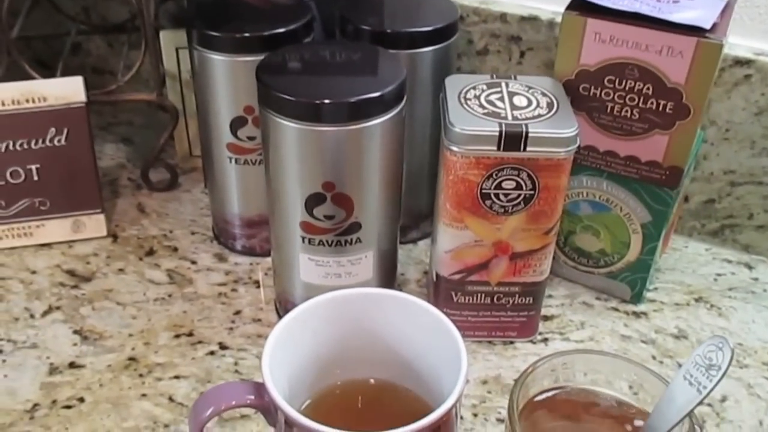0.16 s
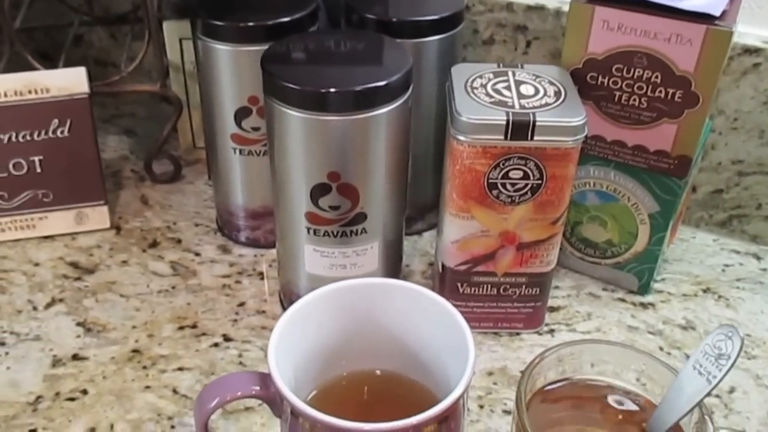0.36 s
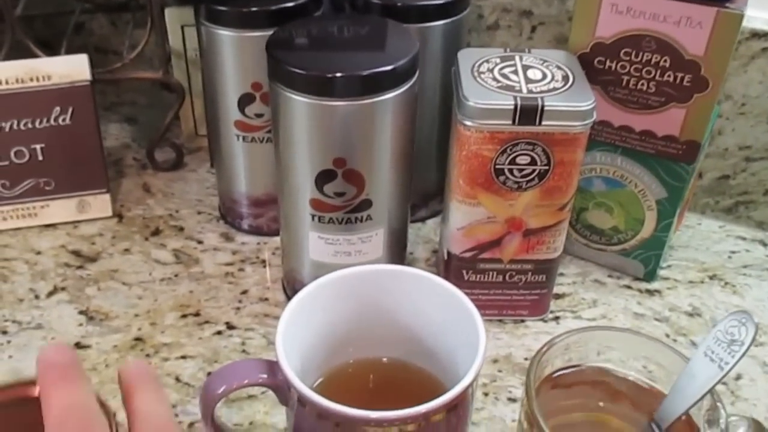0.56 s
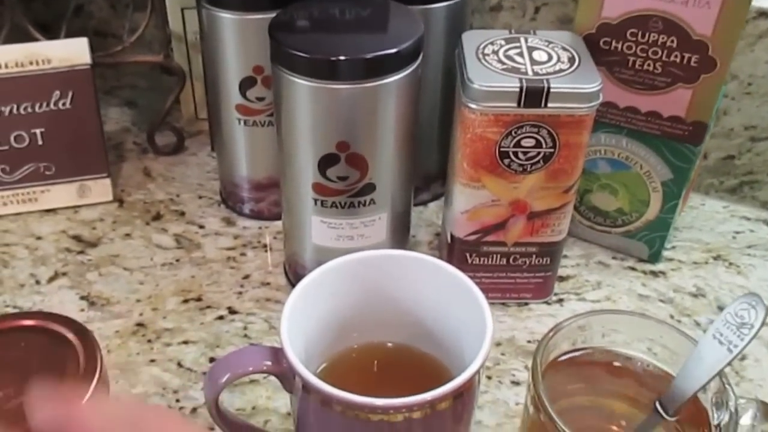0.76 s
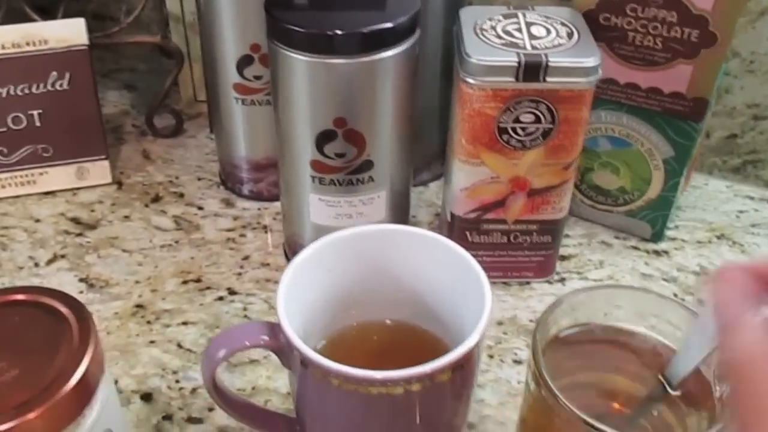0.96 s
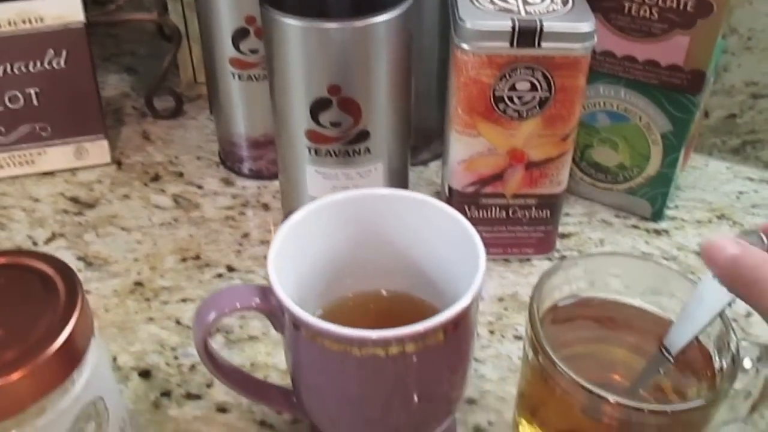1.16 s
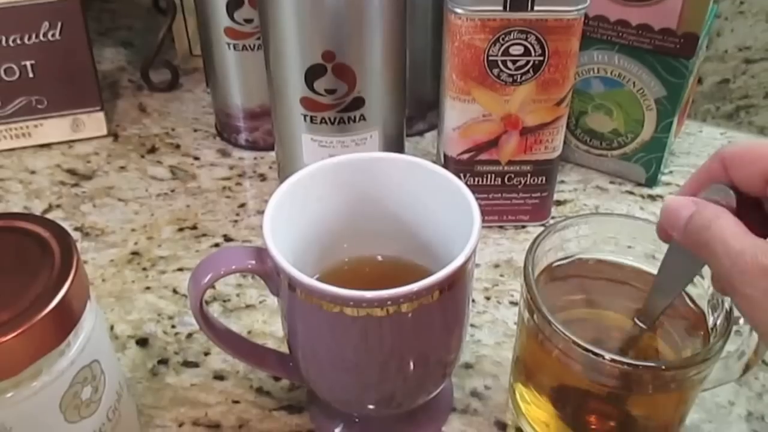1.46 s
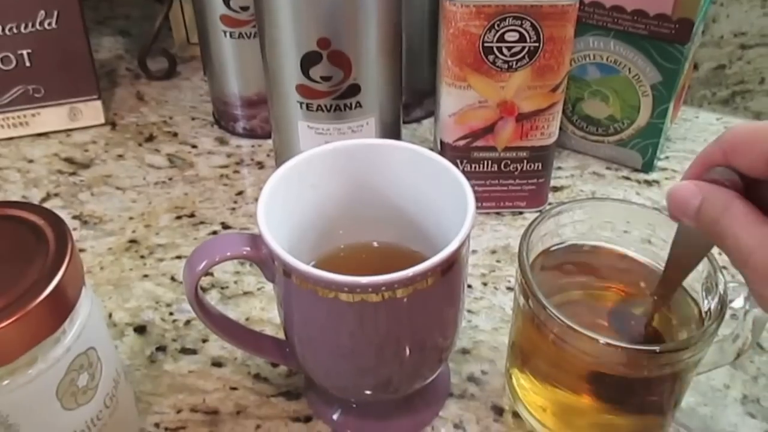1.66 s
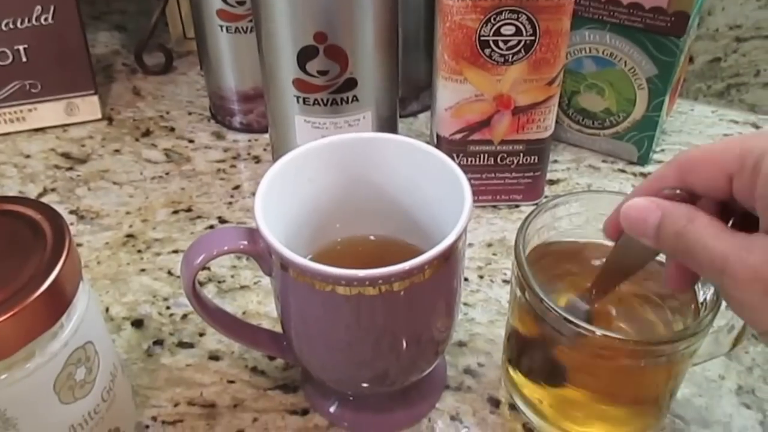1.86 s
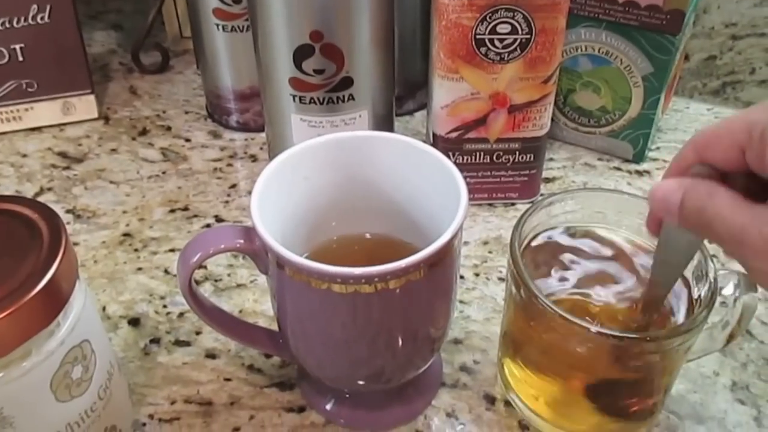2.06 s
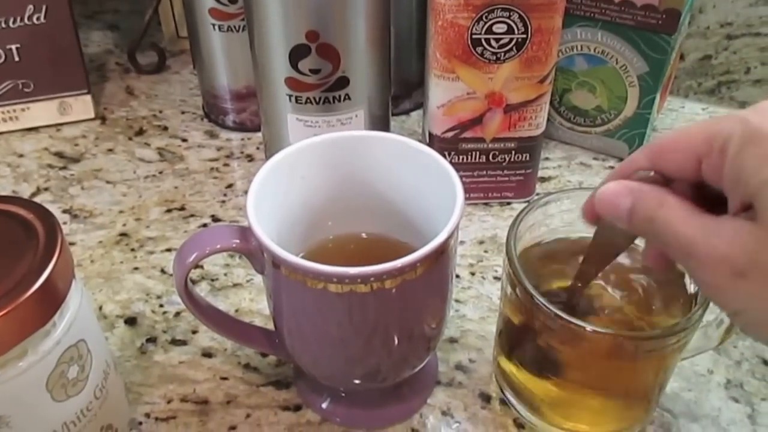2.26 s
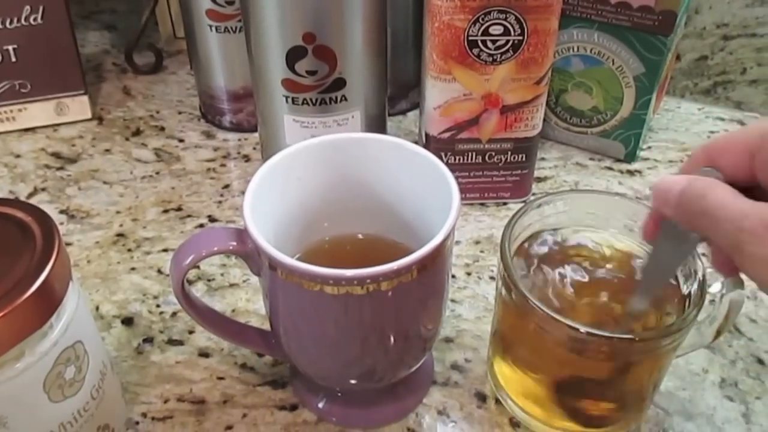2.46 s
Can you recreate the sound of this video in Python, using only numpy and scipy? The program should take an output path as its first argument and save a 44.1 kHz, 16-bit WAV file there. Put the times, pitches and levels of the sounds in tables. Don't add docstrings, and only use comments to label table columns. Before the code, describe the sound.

A teaspoon clinks against a glass mug from about 1.65 s to the end, bright and uneven, strongest near 1.65 and 2.19 s, with soft tea slosh and bubbles from 1.9 s. Earlier, a jar thuds hard on a stone counter at 0.23 s, overloading the close microphone, then slides grittily until 0.85 s. Faint finger ticks near 1.4 s. Low room hum and handling rumble dip after the thud, then rise.

```python
import sys
import numpy as np
from scipy import signal
from scipy.fft import rfft, irfft, next_fast_len
from scipy.io import wavfile
from scipy.ndimage import map_coordinates

SR = 44100
rng = np.random.default_rng(int(sys.argv[2]) if len(sys.argv) > 2 else 0)


def wav_record(signal):
    frames = np.transpose(np.atleast_2d(signal))
    bounded = np.clip(frames, -1, 1)
    quanta = np.round(bounded * 32767).astype(np.int16)
    wavfile.write(sys.argv[1], SR, quanta)


def decibels_to_gain(level_db):
    exponent = np.asarray(level_db, float) / 20
    return 10 ** exponent


N = 114660
TIME = np.arange(N) / SR


def unit(x):
    return x / np.sqrt(np.mean(x ** 2) + 1e-20)


def along(points, hz):
    f, v = np.transpose(points)
    return np.interp(np.log(hz + 1), np.log(f + 1), v)


def curve(rows):
    return np.interp(TIME, *np.transpose(rows))


def wobble(rate_hz):
    points = rng.standard_normal(int(N * rate_hz / SR) + 4)
    return map_coordinates(points, [TIME * rate_hz])


def noise():
    return rng.standard_normal(N)


def sine(hz):
    return np.sin(2 * np.pi * (hz * TIME + rng.random()))


def filtered(x, response):
    m = next_fast_len(N + SR // 2)
    return irfft(rfft(x, m) * response(np.fft.rfftfreq(m, 1 / SR)), m)[:N]


def coloured(spectrum):
    return unit(filtered(noise(), lambda f: decibels_to_gain(along(spectrum, f))))


def peak(f, hz, width_hz):
    return 1j * f * width_hz / (hz * hz - f * f + 1j * f * width_hz)


def strike(start_s, t60_s, rise_s=.0008):
    out, first = np.zeros(N), int(np.ceil(start_s * SR))
    t = TIME[first:first + int(2 * t60_s * SR) + 1] - start_s
    out[first:first + len(t)] = decibels_to_gain(-60 * t / t60_s) * (1 - np.exp(-t / rise_s))
    return out


def ring(start_s, t60_s, unrest):
    body = strike(start_s, t60_s) + decibels_to_gain(-26) * strike(start_s, 3 * t60_s)
    flutter = np.roll(unrest, rng.integers(N)) - 1
    return body * (1 + flutter * np.clip((TIME - start_s) / .01, 0, 1))


# (lower_hz, upper_hz)
WALL_PAIRS = [(1868, 1970), (4695, 4733), (8420, 8910)]
# (lower_t60_s, upper_t60_s)
WALL_DECAYS = [(0.37, 0.52), (0.16, 0.25), (0.28, 0.21)]
# (time_s, shift_percent)
PITCH_SAG = [(2.0, 0), (2.07, -.25), (2.17, -.2), (2.19, -1.1), (2.44, -1.1), (2.48, -.85), (2.56, -.85),
             (2.58, -1.3)]
# (start_s, first_pair_db, second_pair_db, first_upper_over_lower_db, second_upper_over_lower_db)
WALL_BLOWS = [(1.648, -30, -19, 5, -5), (1.66, -29, -33.5, -2.5, -28), (1.937, -43, -46, 6, 1),
              (2.0655, -36.5, -53, 4, 3), (2.078, -50, -35, 6, -8), (2.149, -44, -49, 15, -20),
              (2.1916, -44.5, -22, 18, -3.5), (2.206, -39, -67, -12.5, 0), (2.358, -40, -54.5, -5, 21),
              (2.481, -55, -39, 12, 16), (2.494, -38, -57, -6.5, 13), (2.572, -50, -40.5, -17, -6)]


def mug():
    third_db, third_sag_share = -17, .6
    out = np.zeros(N)
    sag_s = np.cumsum(curve(PITCH_SAG)) / 100 / SR
    unrest = decibels_to_gain(2.25 * wobble(65))
    for start_s, db1, db2, up1, up2 in WALL_BLOWS:
        levels_db = (db1, db2, db2 + third_db)
        pairs = zip(WALL_PAIRS, WALL_DECAYS, levels_db, (up1, up2, 0), (1, 1, third_sag_share))
        for pair_hz, pair_t60_s, db, up_db, share in pairs:
            for hz, t60_s, side in zip(pair_hz, pair_t60_s, (-.5, .5)):
                turns = hz * (TIME + share * sag_s) + rng.random()
                out += decibels_to_gain(db + side * up_db) * ring(start_s, t60_s, unrest) * np.sin(2 * np.pi * turns)
    return out


# (hz, level_db)
CRACK_SPECTRUM = [(500, 1), (1500, 3.5), (5000, 7), (10000, 0), (13000, -5), (16000, -22.5)]


def crack(start_s):
    envelope = strike(start_s, .075, .0003) + 2 * strike(start_s, .008, .0002)
    return envelope * coloured(CRACK_SPECTRUM)


def shimmer(start_s):
    out, t = np.zeros(N), np.arange(SR // 5) / SR
    pick = rng.random((60, 4, 1))
    hz = 1500 + 13700 * pick[:, 0] ** 1.4
    t60_s = .08 * (.5 + pick[:, 2])
    level_db = along(CRACK_SPECTRUM, hz) - 14 * pick[:, 1]
    modes = decibels_to_gain(level_db - 60 * t / t60_s) * np.sin(2 * np.pi * (hz * t + pick[:, 3]))
    part = out[round(start_s * SR):][:len(t)]
    part += (modes.sum(0) * (1 - np.exp(-t / .0008)))[:len(part)]
    return out


# (hz, level_db, t60_s)
HANDLE_MODES = [(1354, 0, .11), (1285, -3, .09), (1400, -4, .1), (2050, -3, .04)]
# (hz, level_db, t60_s)
BOWL_MODES = [(9057, 0, .09), (9720, -19, .12)]
# (hz, level_db, t60_s)
RIM_MODES = [(12305, -5, .11), (12440, -2, .07), (13960, -9, .06), (13100, -9, .06), (15200, -10, .04)]
# (start_s, handle_db, bowl_db, rim_db, crack_db)
SPOON_BLOWS = [(1.646, -25.5, -22, -30, -32.5), (1.663, -28.5, -38, -30, -30.5),
               (1.932, -46, -26, -51, -44.5), (2.068, -35.5, -50, -42, -37.5), (2.15, -51, -44, -50, -41.5),
               (2.1899, -26.5, -14.5, -28, -27.5), (2.356, -46, -27, -55, -45),
               (2.44, -36.5, -43, -43, -38), (2.477, -27, -34, -54, -38), (2.569, -39, -38, -43, -34),
               (2.574, -41, -33, -42, -37.5)]
# (start_s, hz, level_db, t60_s)
GRIP_MODES = [(1.645, 3870, -27, 0.099), (1.645, 5390, -23, 0.057), (1.647, 7120, -24, 0.078),
              (1.645, 9283, -33, 0.13), (1.647, 11140, -25, 0.04), (1.66, 7000, -25, .16),
              (1.663, 9275, -34, .11), (1.934, 3890, -37, 0.066), (1.934, 7079, -37.5, 0.14),
              (1.932, 7020, -37, .07), (1.934, 8441, -38.5, 0.26), (2.067, 3820, -33.5, .03),
              (2.073, 3230, -45, 0.1), (2.067, 5550, -36, 0.076), (2.07, 8618, -34, 0.094),
              (2.067, 9240, -32.5, 0.15), (2.067, 9520, -36, 0.093), (2.074, 11300, -41, 0.12),
              (2.07, 11760, -46, .06), (2.15, 9250, -39, 0.098), (2.15, 7900, -39, .03),
              (2.151, 10158, -37, 0.055), (2.149, 11245, -41, 0.079), (2.1915, 3873, -18.5, 0.051),
              (2.1896, 6975, -22.5, 0.23), (2.1895, 9250, -18.5, 0.083), (2.1875, 5302, -31.5, 0.072),
              (2.1875, 7250, -27.5, 0.062), (2.358, 7180, -31.5, 0.054), (2.358, 6900, -41, .06),
              (2.357, 3820, -47, 0.073), (2.359, 1780, -42, 0.096), (2.442, 5320, -28, 0.032),
              (2.442, 7000, -38, 0.066), (2.442, 11360, -40, 0.089), (2.478, 5652, -24, 0.03),
              (2.478, 11480, -38, 0.12), (2.479, 3440, -34.5, .06), (2.478, 7089, -38, 0.096),
              (2.57, 11202, -32, 0.074), (2.575, 10870, -28, .07), (2.571, 9280, -30.5, 0.095),
              (2.573, 5300, -34, .06)]


def spoon():
    scatter_db, detune = 1.5, .001
    out = np.zeros(N)
    unrest = decibels_to_gain(4.5 * wobble(130))
    for start_s, *levels_db, crack_db in SPOON_BLOWS:
        for family, family_db in zip((HANDLE_MODES, BOWL_MODES, RIM_MODES), levels_db):
            for hz, mode_db, t60_s in family:
                level_db = family_db + mode_db + scatter_db * rng.standard_normal()
                mode_hz = hz * (1 + detune * rng.standard_normal())
                out += decibels_to_gain(level_db) * ring(start_s, t60_s, unrest) * sine(mode_hz)
        out += decibels_to_gain(crack_db) * (crack(start_s) + decibels_to_gain(-11) * shimmer(start_s))
    for start_s, hz, level_db, t60_s in GRIP_MODES:
        out += decibels_to_gain(level_db) * ring(start_s, t60_s, unrest) * sine(hz)
    return out


# (hz, width_hz, level_db)
SLAB_MODES = [(271, 70, -13.5), (496, 320, -6), (553, 55, 1), (699, 59, -2.5), (855.5, 47, 3.5),
              (1072, 56, -3.5), (1286, 24, -6.5), (1724, 550, -11.5)]


def stone(f):
    return sum((-1) ** k * decibels_to_gain(db) * peak(f, hz, width) for k, (hz, width, db) in enumerate(SLAB_MODES))


# (start_s, level_db, t60_s, brightest_hz)
SLAB_KNOCKS = [(.012, -31.5, 0.38, 650), (0.183, -21.5, 0.0066, 1200), (0.21, -9, 0.076, 800),
               (0.2256, -4.5, 0.09, 800), (0.434, -21.5, 0.14, 2420), (1.647, -29.5, 0.23, 1544),
               (1.745, -43, 0.05, 473), (1.933, -29, 0.15, 1040), (1.986, -32, 0.029, 930),
               (2.069, -33.5, 0.086, 1500), (2.151, -36, 0.039, 1200), (2.19, -24, 0.14, 1530),
               (2.353, -26.5, 0.34, 1100), (2.4401, -14.5, 0.11, 870), (2.477, -20, 0.11, 1310),
               (2.57, -19.5, 0.078, 890)]


def knocks():
    out = np.zeros(N)
    for start_s, level_db, t60_s, top_hz in SLAB_KNOCKS:
        rattle = strike(start_s, t60_s, .00058) * noise()
        contact = 4.3 * strike(start_s, .00099, .00053)
        knock = filtered(rattle + contact, lambda f: stone(f) / (1 + 1j * f / top_hz) ** 2)
        out += decibels_to_gain(level_db) * knock / np.abs(knock).max()
    return out


# (hz, level_db)
SLAP_SPECTRUM = [(300, -33), (2000, -2.5), (5500, -4.5), (9000, -10), (13000, -18.5), (16000, -31.5)]


def set_down():
    thud_s, hold_s = .2327, .0062
    since_s = TIME - thud_s
    held_s = np.maximum(since_s - hold_s, 0)
    thud = (TIME > thud_s) * decibels_to_gain(-60 * held_s / .012) * strike(thud_s, .31, .00051)
    thud *= np.sin(2 * np.pi * 500 * since_s)
    boom = strike(thud_s, .22, .0059) * np.sin(2 * np.pi * 86 * since_s)
    fade = decibels_to_gain(-60 * held_s / .025) + decibels_to_gain(-12.5 - 60 * np.maximum(since_s, 0) / .24)
    slap = fade * strike(.2259, .31, .0084) * coloured(SLAP_SPECTRUM)
    return decibels_to_gain(-30) * boom - decibels_to_gain(3) * thud + decibels_to_gain(-16.5) * slap


# (time_s, level_db)
SLIDE_LEVEL = [(0, -41), (.1, -83), (.165, -55.5), (.19, -30.5), (.25, -38), (.3, -35.5), (.42, -42),
               (.55, -41.5), (.77, -46.5), (.84, -59.5), (.92, -78.5)]
# (hz, level_db)
SLIDE_SPECTRUM = [(200, -20), (420, -6), (600, -5), (850, -4), (1130, -5.5), (1260, -16.5), (2500, -25.5),
                  (5000, -50)]


def slide():
    grit = noise() * decibels_to_gain(2.5 * wobble(600) + .57 * wobble(59))
    scrape = filtered(grit, lambda f: decibels_to_gain(along(SLIDE_SPECTRUM, f)) * (.6 + np.abs(stone(f))))
    return decibels_to_gain(curve(SLIDE_LEVEL)) * unit(scrape)


def creep():
    start_s, end_s, hz, width_hz, level_db = 1.25, 1.92, 540, 150, -56
    rub = unit(filtered(noise(), lambda f: peak(f, hz, width_hz) ** 2))
    return decibels_to_gain(level_db) * rub * np.clip(np.minimum(TIME - start_s, end_s - TIME) / .057, 0, 1)


# (start_s, level_db, hz, width_hz)
SMALL_TICKS = [(0.398, -28, 900, 220), (0.743, -51, 3900, 5000), (.86, -52, 3600, 6000),
               (0.963, -52.5, 7970, 7890), (1.215, -49, 5400, 6880), (1.368, -43.5, 2310, 600),
               (1.4645, -30, 5340, 2200), (1.499, -33, 2740, 580), (2.442, -35.5, 78, 74),
               (1.926, -40, 5200, 504), (1.9, -55, 9200, 6900), (2.328, -43, 11000, 6400),
               (2.347, -37, 6900, 1500), (1.842, -53, 14100, 600), (0.42, -36, 230, 73),
               (.57, -53, 5600, 5000), (1.17, -60, 5000, 6000)]


def small_ticks():
    out = np.zeros(N)
    for start_s, level_db, hz, width_hz in SMALL_TICKS:
        envelope = strike(start_s, .013, .0005) if width_hz < 2500 else strike(start_s, .07, .004)
        order = 2 if hz > 1000 else 3
        tick = filtered(envelope * noise(), lambda f: peak(f, hz, width_hz) ** order)
        out += decibels_to_gain(level_db) * tick / np.abs(tick).max()
    return out


def steel_ring():
    start_s, end_s, hz, level_db = .63, .86, 4500, -65
    tones = np.sin(2 * np.pi * hz * TIME) + .6 * np.sin(2 * np.pi * .589 * hz * TIME)
    return decibels_to_gain(level_db) * strike(start_s, 1.5, .004) * np.clip((end_s - TIME) / .05, 0, 1) * tones


# (time_s, level_db)
STIR_LEVEL = [(1.82, -73), (1.93, -47), (2.0, -46), (2.1, -61), (2.24, -49.5), (2.33, -55.5), (2.4, -46.5),
              (2.6, -52)]


def tea(count=150):
    centre_hz, spread, cycles, bubble_db = 800, .476, 6.6, 2
    start_s = STIR_LEVEL[0][0]
    pick, t = rng.random((count, 2, 1)), np.arange(SR // 20) / SR
    hz = centre_hz * np.exp(spread * rng.standard_normal((count, 1)))
    turns = np.maximum(hz, centre_hz / 2) * t
    pops = decibels_to_gain(-14 * pick[:, 1] - 60 * turns / cycles / 2) * (1 - np.exp(-turns))
    pops *= np.sin(2 * np.pi * turns * (1 + .013 * turns))
    pop_s = start_s + (TIME[-1] - start_s) * pick[:, 0]
    at = (SR * pop_s).astype(int) + np.arange(len(t))
    bubbles = np.bincount(at.ravel(), pops.ravel(), N + SR)[:N]
    bubbles /= bubbles[TIME > start_s].std()
    slosh = unit(filtered(noise(), stone)) * decibels_to_gain(1.3 * wobble(40))
    return decibels_to_gain(curve(STIR_LEVEL)) * (slosh + decibels_to_gain(bubble_db) * bubbles) * (TIME > start_s)


# (hz, t60_s)
ROOM_DECAY = [(200, 0.26), (1000, 0.29), (4000, 0.38), (12000, 0.23)]


def kitchen(x):
    hz, t, z = signal.stft(rng.standard_normal(SR // 2), SR, nperseg=256)
    fade = decibels_to_gain(-60 * t / along(ROOM_DECAY, hz)[:, None])
    tail = signal.istft(z * fade, SR, nperseg=256)[1]
    return signal.fftconvolve(np.pad(x, (250, 0)), tail / np.linalg.norm(tail))[:N]


# (hz, level_db)
AIR_SPECTRUM = [(60, -23), (90, 2.5), (170, -3.5), (385, -15), (1500, -22), (6500, -27.5), (10000, -31.5),
                (16000, -43.5)]
# (time_s, gain_db)
FLOOR_GAIN = [(0, 6), (.22, 5.5), (.26, -4.5), (.6, -5.5), (1.2, 0.5), (1.6, 3.5), (1.7, 3.5), (2.05, 3.5),
              (2.6, 10.5)]


def air():
    gain_db = curve(FLOOR_GAIN)
    tone = coloured(AIR_SPECTRUM)
    high = filtered(tone, lambda f: (f / 1000) ** 2 / (1 + (f / 1000) ** 2))
    low = tone - high
    return decibels_to_gain(-54.5) * (decibels_to_gain(.64 * gain_db) * low + decibels_to_gain(gain_db + 2.2 * wobble(33)) * high)


# (time_s, level_db)
RUMBLE_LEVEL = [(0, -45), (.25, -48), (.33, -61), (.9, -58.5), (1.6, -57), (1.8, -47.5), (2.1, -54),
                (2.4, -49.5), (2.6, -44.5)]


def hand_rumble():
    hz = 56 - 5.5 * TIME + 5 * wobble(3.9)
    level_db = curve(RUMBLE_LEVEL) + 2.5 + .75 * wobble(6.2)
    return decibels_to_gain(level_db) * np.sin(2 * np.pi * np.cumsum(hz) / SR)


def scene():
    near = mug() + spoon() + knocks() + set_down() + slide() + creep()
    near += small_ticks() + steel_ring() + tea()
    return (near + decibels_to_gain(-17.5) * kitchen(near) + air() + hand_rumble())[None]


def band_limit(x):
    return signal.sosfilt(signal.butter(12, 16480, fs=SR, output="sos"), x)


def record(dry):
    hardness = 6
    clipped = dry / (1 + np.abs(dry) ** hardness) ** (1 / hardness)
    mix = filtered(clipped[0], lambda f: 1 / (1 + (f / 15700) ** 40))[None]
    return band_limit(mix)


dry = scene()
out = record(dry)
wav_record(out)
```